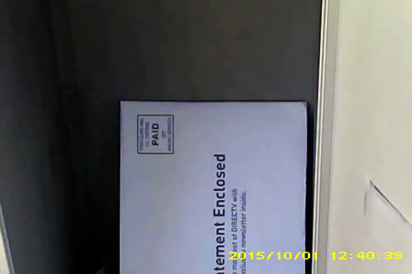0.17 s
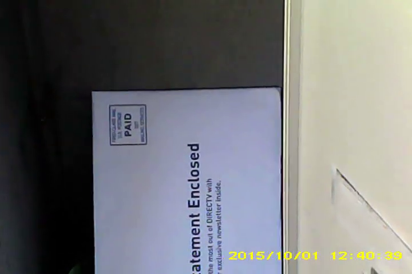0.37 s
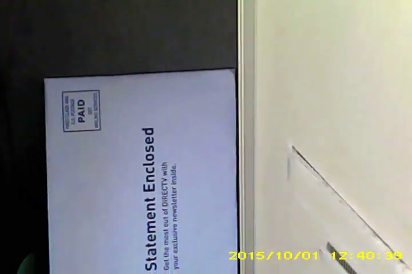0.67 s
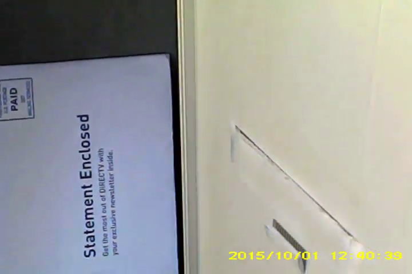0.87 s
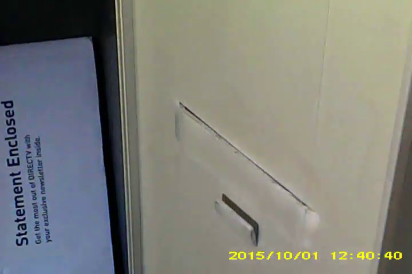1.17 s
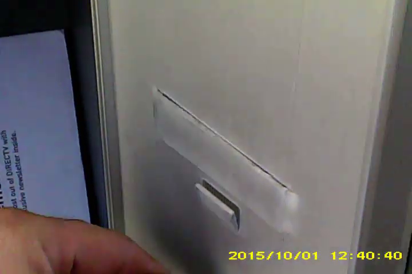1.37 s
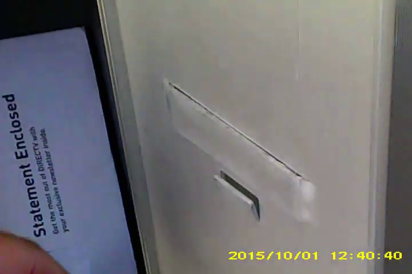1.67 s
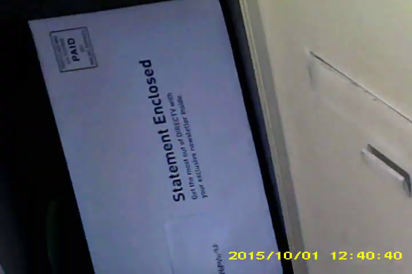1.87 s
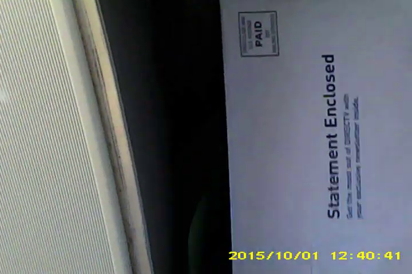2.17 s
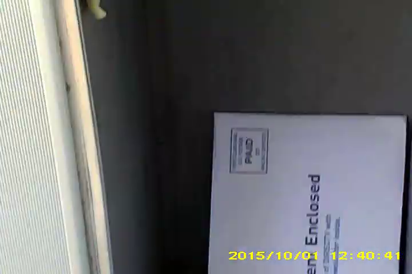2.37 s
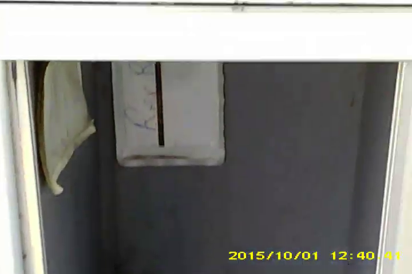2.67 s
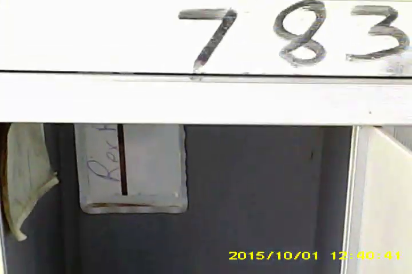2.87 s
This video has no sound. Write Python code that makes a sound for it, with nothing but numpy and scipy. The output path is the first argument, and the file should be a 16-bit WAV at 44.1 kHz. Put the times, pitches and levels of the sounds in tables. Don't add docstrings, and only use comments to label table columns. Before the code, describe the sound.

A metal mailbox gets one sharp, hollow bang near two seconds, with clattering rebounds dying within half a second. Before and after, muffled traffic rumble and receding tyre roar; close, cheap outdoor camera microphone.

```python
import sys
import numpy as np
from scipy import signal
from scipy.io import wavfile
from scipy.ndimage import uniform_filter1d

SR = 44100
rng = np.random.default_rng(int(sys.argv[2]) if len(sys.argv) > 2 else 0)


def magnitude_from_level(level_db):
    exponent = np.asarray(level_db, float) / 20
    return 10 ** exponent


def waveform_to_disk(signal):
    frames = np.transpose(np.atleast_2d(signal))
    scaled = np.clip(frames, -1, 1) * 32767
    samples = np.round(scaled).astype(np.int16)
    wavfile.write(sys.argv[1], SR, samples)


N = 132741


def evened(x):
    return x / np.sqrt(np.mean(x ** 2) + 1e-20)


def read(points, hz):
    f, value = np.transpose(points)
    return np.interp(np.log(hz + 1), np.log(f + 1), value)


def level_over_time(points, **outside):
    return np.interp(np.arange(N) / SR, *np.transpose(points), **outside)


def add(mix, start_s, sound):
    part = mix[round(start_s * SR):][:len(sound)]
    part += sound[:len(part)]


def noise(colour, patchy_db):
    frames, hz = N // 512 + 5, np.fft.rfftfreq(2048, 1 / SR)
    real, imaginary, patches = rng.standard_normal((frames, 1025, 3)).T
    patches = uniform_filter1d(patches, size=16, axis=0)
    patches = evened(uniform_filter1d(patches, size=10, axis=1))
    gain = magnitude_from_level(read(colour, hz)[:, None] + patchy_db * patches)
    spectra = (real + 1j * imaginary) * gain
    return evened(signal.istft(spectra, nperseg=2048, noverlap=1536)[1][:N])


def causal(colour):
    log_gain = np.log(magnitude_from_level(read(colour, abs(np.fft.fftfreq(8192, 1 / SR)))))
    return np.fft.ifft(np.exp(np.conj(signal.hilbert(log_gain)))).real[:2048]


def ring(modes, rise_s):
    t = np.arange(SR * 3 // 4) / SR
    hz, db, t60 = np.transpose(modes)[:, :, None]
    strength, tune, phase = rng.random((3, len(hz), 1))
    detune = 0.03
    bent_hz = hz * (1 + detune * (tune - 0.5))
    decay = magnitude_from_level(db + 7.0 * strength - 60 * t / t60)
    tones = decay * np.sin(2 * np.pi * (bent_hz * t + phase))
    return tones.sum(0) / np.sqrt(len(hz)) * (1 - np.exp(-t / rise_s))


PANEL_RISE_S = 0.0021
# pitch in Hz, level in dB, 60 dB decay in seconds.
PANEL_MODES = [(457.3, 2.5, 0.2), (507.6, 0, 0.086), (689.3, -3, 0.13), (821, -9.5, .2), (1050, 0.5, 0.15),
               (1627, -7.5, 0.25), (1867, -10.5, 0.52), (2164, -19.5, 0.17), (2670, -21, 0.1),
               (3060, -22, 0.26), (3397, -5.5, 0.15), (3770, -9, .2), (3709, -14, 0.16), (4500, -9.5, .3)]


def panel_tones():
    return ring(PANEL_MODES, PANEL_RISE_S)


# frequency in Hz, level in dB.
CLANG_COLOUR = [(200, -3.5), (500, 4), (1000, -1), (2000, -6.5), (3800, 2), (6000, 9.5), (8000, 0.5),
                (10500, 3.5)]
# frequency in Hz, 60 dB decay in seconds.
CLANG_DECAY = [(250, 0.43), (1000, 0.35), (3000, .3), (6000, 0.3), (11000, 0.14)]


def panel_clang():
    grit = rng.standard_normal(SR // 2)
    hz, t, spectra = signal.stft(grit, SR, nperseg=256)
    fade_db = 60 * t / read(CLANG_DECAY, hz)[:, None]
    spectra = spectra * magnitude_from_level(read(CLANG_COLOUR, hz)[:, None] - fade_db)
    clang = signal.istft(spectra, SR, nperseg=256)[1][:len(grit)]
    rise = 1 - np.exp(-np.arange(len(grit)) / SR / PANEL_RISE_S)
    return clang / clang[:1000].std() * rise


# pitch in Hz, level in dB, 60 dB decay in seconds.
BOX_MODES = [(45, 1.5, .2), (88.5, -9, 0.11), (121.7, 5, 0.17), (157.7, 2.5, 0.16), (193.6, 5.5, 0.11),
             (244, -4, 0.24), (326.2, -22.5, 0.44)]


def box_boom():
    return ring(BOX_MODES, rise_s=0.01)


def tick(db, hz):
    spread, decay_s = 0.22, 0.0016
    grit = rng.standard_normal(400)
    band = signal.butter(2, [hz * (1 - spread), hz * (1 + spread)], "band", fs=SR)
    fade = np.exp(-np.arange(len(grit)) / SR / decay_s)
    return magnitude_from_level(db + 27) * signal.lfilter(*band, grit) * fade


# start in seconds, panel level in dB, box level in dB, tick level in dB.
BLOWS = [(1.974, -13, -15, -20.5), (1.980, -5, -19.5, -5), (1.997, -7.5, -11, -26), (2.024, -9, -9, -33),
         (2.050, -11, -16.5, -30), (2.072, -12, -8, -27), (2.139, -15, -10, -34), (2.152, -15, -7.5, -39),
         (2.172, -20, -6.5, -30), (2.236, -22.5, -25.5, -21), (2.271, -24.5, -14, -44),
         (2.305, -26, -16.5, -42), (2.345, -34.5, -17, -50), (2.372, -27, -17, -40),
         (2.398, -35.5, -16, -40), (2.456, -31.5, -17, -47)]
# start in seconds, level in dB, pitch in Hz.
LOOSE_TICKS = [(0.583, -33, 6000), (.747, -44, 6000), (1.973, -17.5, 3830), (1.9722, -6.5, 10000),
               (2.147, -25, 10000), (2.176, -26, 6500), (2.211, -29, 9500), (2.223, -30, 9500),
               (2.245, -18.5, 6500), (2.237, -27, 4500), (2.238, -23.5, 9500), (2.270, -29.5, 10000),
               (2.374, -28, 4300), (2.434, -29.5, 9400), (2.453, -28.5, 9400), (2.515, -33, 9300)]


def mailbox():
    out = np.zeros(N)
    for start_s, panel_db, box_db, tick_db in BLOWS:
        add(out, start_s, magnitude_from_level(panel_db) * panel_tones())
        add(out, start_s, magnitude_from_level(panel_db + 7.5) * panel_clang())
        add(out, start_s, magnitude_from_level(box_db) * box_boom())
        add(out, start_s, tick(tick_db, hz=6500))
    for start_s, db, hz in LOOSE_TICKS:
        add(out, start_s, tick(db, hz))
    return out


# time in seconds, level in dB.
CHATTER_LEVEL = [
    (1.978, -49.5),
    (1.982, 8.5),
    (2.01, 15),
    (2.085, 1),
    (2.1, -12),
    (2.135, -12.5),
    (2.185, -7),
    (2.21, -22),
    (2.3, -40),
]
# frequency in Hz, level in dB.
CHATTER_COLOUR = [(1500, -38.5), (3000, -18.5), (3800, -13), (5000, -8), (7000, -4.5), (9500, -5),
                  (12000, -4), (16000, -6)]


def door_chatter():
    clicks_per_s = 6000
    strength = magnitude_from_level(3.0 * rng.exponential(1, N))
    hits = rng.random(N) < clicks_per_s / SR
    clicks = strength * hits * rng.choice([-1., 1.], N)
    rattle = evened(signal.oaconvolve(clicks, causal(CHATTER_COLOUR))[:N])
    return magnitude_from_level(level_over_time(CHATTER_LEVEL, left=-90, right=-90)) * rattle


# time in seconds, level in dB.
CAR_LEVEL = [
    (0, -20.5),
    (.3, -19.5),
    (.7, -18),
    (1.1, -19.5),
    (1.5, -21),
    (1.9, -22.5),
    (2.3, -25),
    (2.75, -24.5),
    (3.01, -24),
]
# frequency in Hz, level in dB.
ROAR_COLOUR = [(150, 2), (300, -14), (450, -1), (800, 4), (1100, 2), (1400, 1), (2000, -1.5), (12000, -4.5)]
# frequency in Hz, level in dB.
RUMBLE_COLOUR = [(12, -15.5), (30, 4.5), (60, -1), (110, -3), (160, -16), (260, -12), (400, -14.5),
                 (900, -25.5)]


def road():
    rumble_db, rumble_follows = -24.5, 0.14
    car_db = level_over_time(CAR_LEVEL)
    swell_db = rumble_follows * (car_db - car_db.mean())
    roar = magnitude_from_level(car_db + 1.3) * noise(ROAR_COLOUR, patchy_db=1.42)
    rumble = magnitude_from_level(rumble_db + swell_db) * noise(RUMBLE_COLOUR, patchy_db=2.0)
    return roar + rumble


def scene():
    return (mailbox() + door_chatter() + road())[None]


# frequency in Hz, level in dB.
HISS_COLOUR = [(3100, -11), (6100, 5), (8100, -27), (9600, 5), (10900, -14), (12100, -39)]
# pitch in Hz, level in dB.
WHINE_PARTNERS = [(10702, -91), (11348, -95)]


def electronics():
    hiss_db, whine_db, whine_hz = -77, -74, 7348
    gaps_per_s, gap_s = 25.85, 1.604
    t = np.arange(N) / SR
    gate = np.minimum(3.5 * abs(np.sin(np.pi * gaps_per_s * (t - gap_s))), 1)
    whine = magnitude_from_level(whine_db) * gate * np.sin(2 * np.pi * whine_hz * t)
    partners = sum(magnitude_from_level(db) * np.sin(2 * np.pi * hz * t) for hz, db in WHINE_PARTNERS)
    return magnitude_from_level(hiss_db) * noise(HISS_COLOUR, patchy_db=1.5) + whine + partners


def top_cut(x):
    return signal.sosfilt(signal.butter(12, 12200, fs=SR, output="sos"), x)


# frequency in Hz, level in dB.
MIC_COLOUR = [(21, 3), (2160, 6.5), (2660, -9), (3210, -14), (3760, -13.5), (4420, -28.5), (5250, -40),
              (11100, -49)]


def record(dry):
    ceiling, knee = 0.72, 1.9
    overload_hz, edge_hz, offset = 6500, 11200, -0.0045
    x = signal.oaconvolve(dry, causal(MIC_COLOUR)[None])[:, :N] / ceiling
    squash = x / (1 + abs(x) ** (2 * knee)) ** (0.5 / knee) - x
    squash = signal.sosfiltfilt(signal.butter(2, overload_hz, fs=SR, output="sos"), squash)
    x = ceiling * (x + squash) + electronics()
    x = signal.oaconvolve(x, signal.firwin(41, edge_hz, fs=SR)[None], "same") + offset
    return top_cut(x)


dry = scene()
out = record(dry)
waveform_to_disk(out)
```